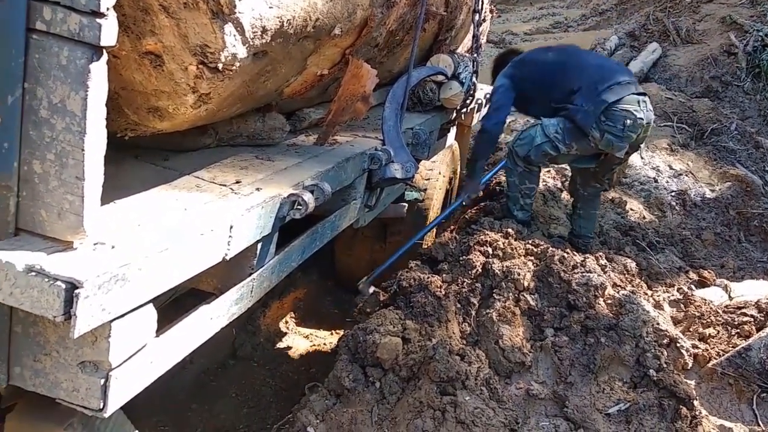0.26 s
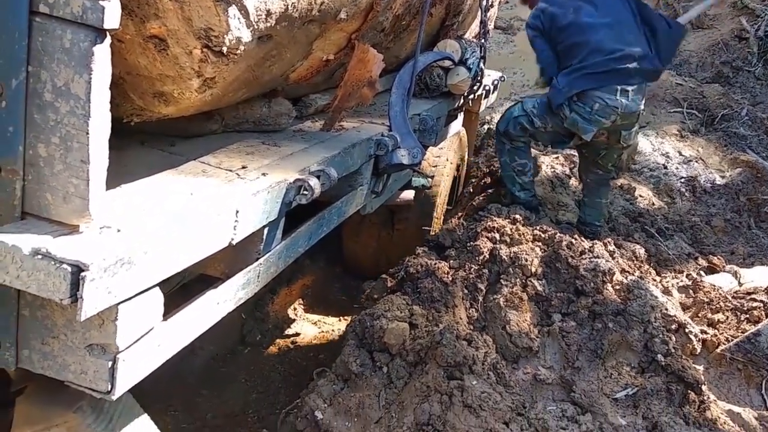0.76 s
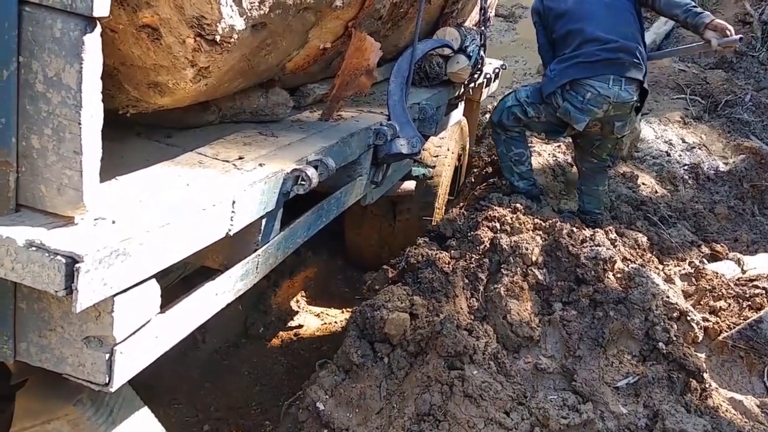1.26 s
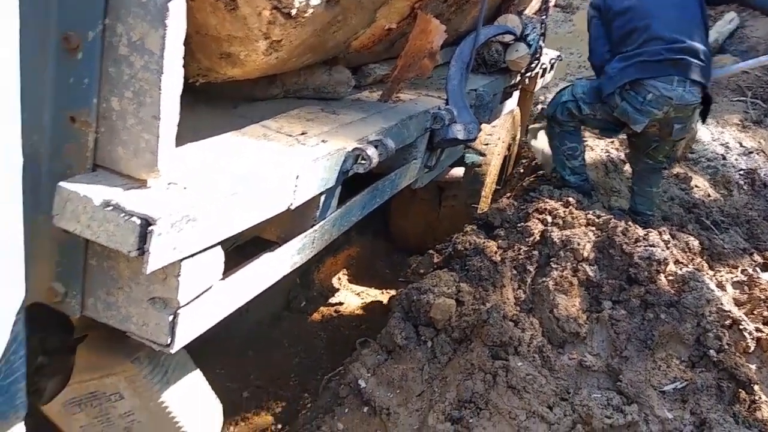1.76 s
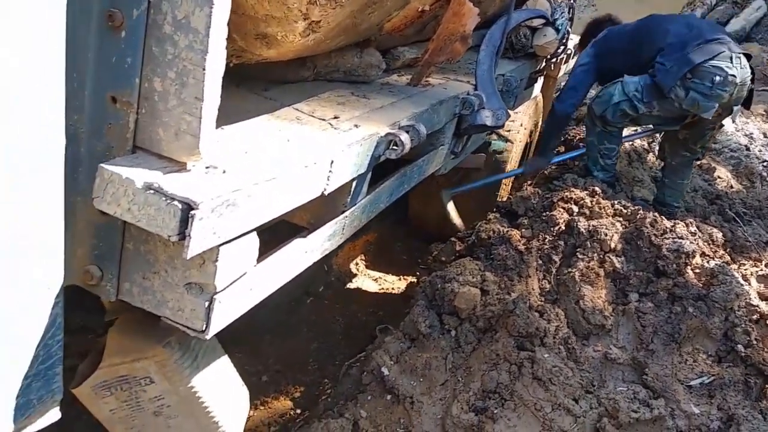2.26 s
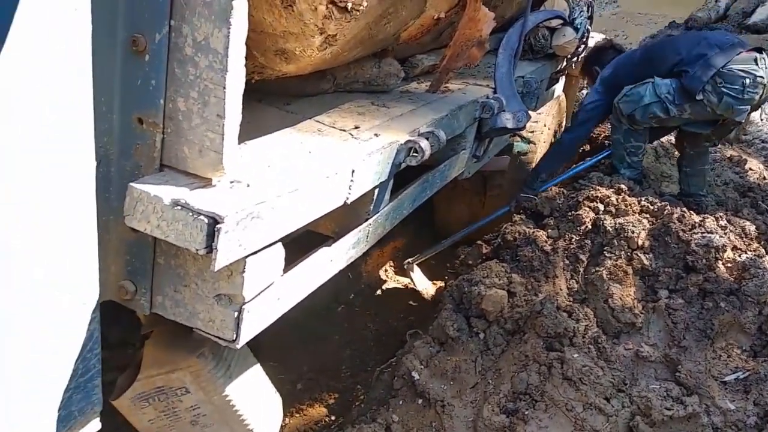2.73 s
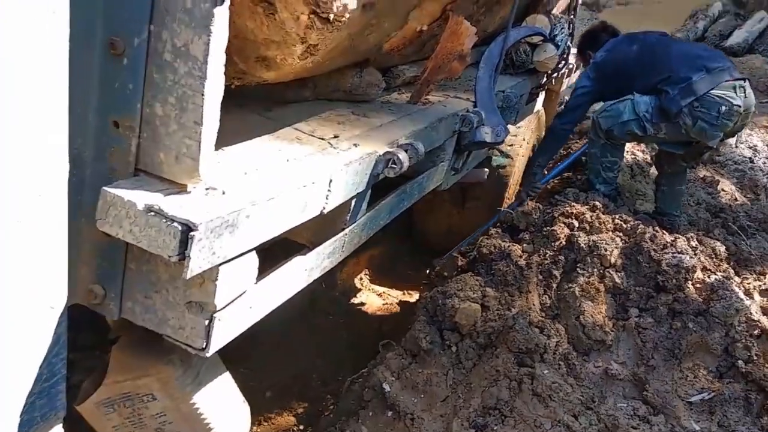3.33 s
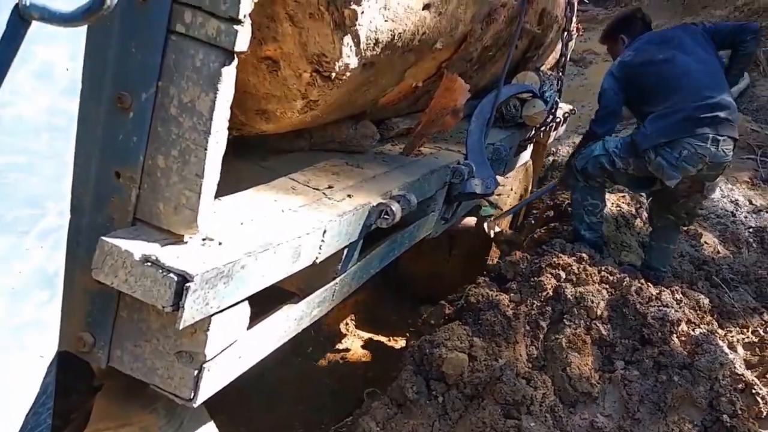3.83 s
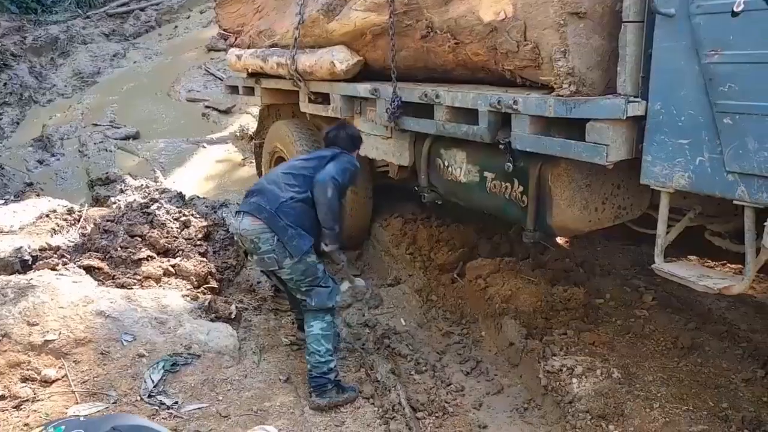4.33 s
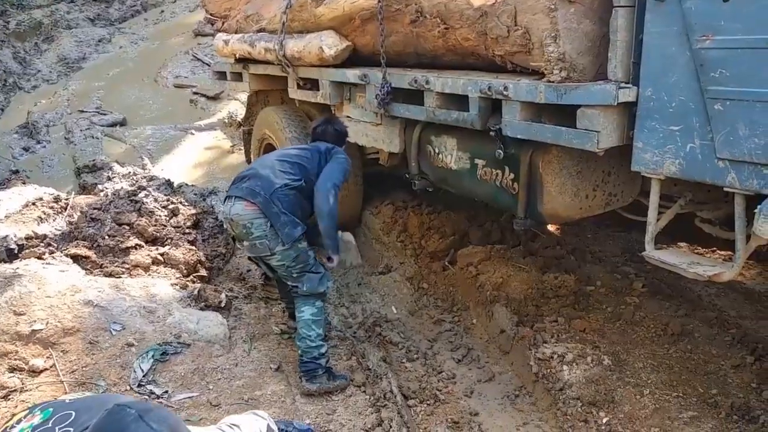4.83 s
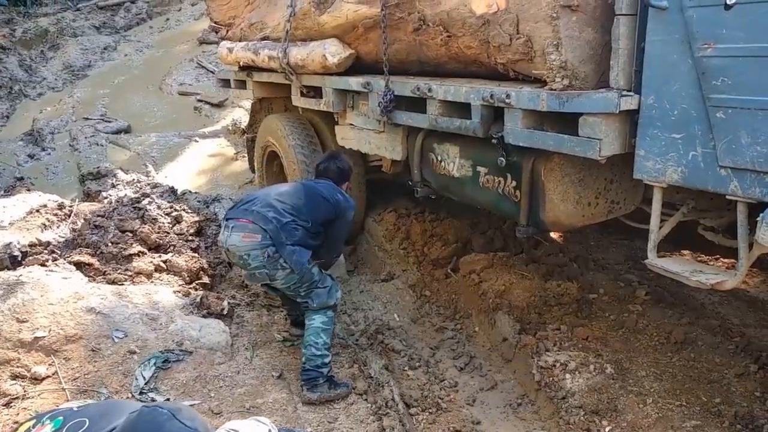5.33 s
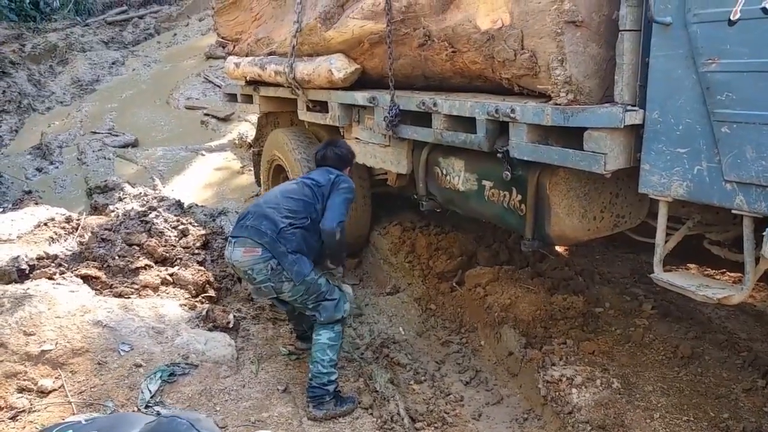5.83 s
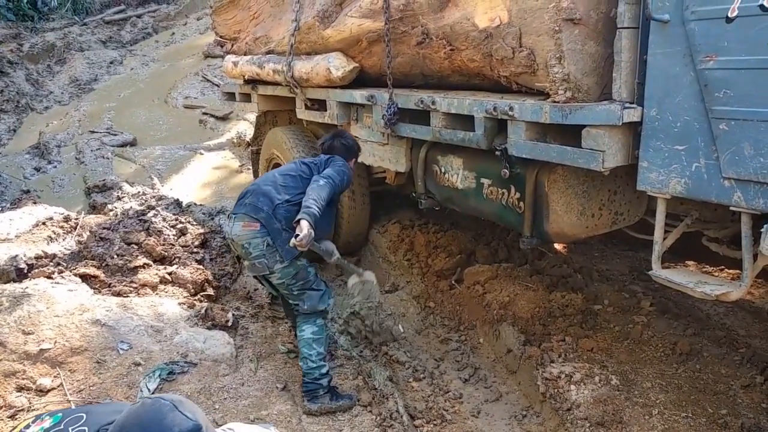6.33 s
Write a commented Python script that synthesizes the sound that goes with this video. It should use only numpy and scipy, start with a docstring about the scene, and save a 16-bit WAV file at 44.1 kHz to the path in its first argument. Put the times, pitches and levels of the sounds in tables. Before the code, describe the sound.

Outdoors, close to a stuck truck, a shovel works wet, gritty soil over a very faint airy hush. At 0.2 s it cuts in with a soft crunch and a dull clod; another cut comes near 0.8 s, and a low bump on the microphone at 0.9 s. It is then nearly quiet, with tiny ticks and thin distant whistles. At 2.18 s a hard thrust cracks and booms in the hollow under the bed, with wet lumps breaking, gulps and bright spray, sinking into a low gurgle by about 3 s. A click and squeak at 3.1 s precede gritty cuts and steel knocks at 3.35-4.0 s, and a bump at 4.1 s. From 4.2 s the digging is darker and muddier: chops, a scrape at 4.9 s, then a dense flurry from 5.3 to 6.2 s with a sharp clank at 5.44 s, heavy wet slaps, squelches and short groans, peaking again at 6.02 s before light sliding.

```python
"""Outdoors at the wheel of a stuck truck, a shovel digs wet soil, heard on a two-port microphone.
Cuts, drags, slaps and clods are bursts of fractures and rubbing noise; stones, knocks and groans ring the blade.
One hard thrust booms in the hollow under the truck bed with breaking lumps, gulps, spray and a gurgle.
Later the digging is busier, and wet mud squelches as popping bubbles. The camera is bumped lightly now and then.
Faint air of drifting filtered noise and a few thin, distant whistles lie behind."""
import sys
import numpy as np
from scipy import signal
from scipy.fft import rfft, irfft, next_fast_len
from scipy.io import wavfile
from scipy.ndimage import uniform_filter1d, map_coordinates

SR = 44100
rng = np.random.default_rng(int(sys.argv[2]) if len(sys.argv) > 2 else 0)


def store_wav(level_fs):
    """Save 16-bit WAV to argv[1]."""
    pcm = np.round(np.clip(np.atleast_2d(level_fs), -1, 1) * 32767)
    wavfile.write(sys.argv[1], SR, pcm.T.astype(np.int16))


N = 290178
T = np.arange(N) / SR
THRUST_S = 2.183  # the hard thrust under the truck bed

# How alike the two microphone ports hear a pitch. Each row: frequency in Hz, left-right correlation (0 to 1).
LIKENESS = [(60, 0.75), (190, 0.94), (320, 0.87), (640, 0.77), (1400, 0.18), (3100, .02), (15000, .018)]
# Balance of a plain cut or slap: relative levels in dB of thud, squelch, crunch and hiss.
CUT_BALANCE = [-2, 1.5, 3.5, -5.5]


def amp(db):
    """Decibels to gain."""
    return 10 ** (np.asarray(db) / 20)


def unit(x):
    """x at rms 1."""
    return x / np.sqrt(np.mean(x ** 2) + 1e-20)


def along(points, hz):
    """Interpolate (Hz, value) points on a log frequency axis."""
    f, v = np.transpose(points)
    return np.interp(np.log(hz + 1), np.log(f + 1), v)


def filtered(x, response):
    """x times a response of frequency, with zeros behind it to take up the tail."""
    n = x.shape[-1]
    m = next_fast_len(n + 2048, real=True)
    return irfft(rfft(x, m) * response(np.fft.rfftfreq(m, 1 / SR)), m)[..., :n]


def add(track, s, sound):
    """Mix a sound into a track at time s."""
    part = track[..., round(s * SR):][..., :sound.shape[-1]]
    part += sound[..., :part.shape[-1]]


def wander(knots, place, **options):
    """A smooth random curve through unit-variance knots, read at the given knot positions."""
    return map_coordinates(rng.standard_normal(knots), [place], **options)


def port_phase(hz):
    """Phase gap in radians between the ports: it widens as a pitch is heard less alike."""
    return np.arccos(np.clip(along(LIKENESS, hz), -1, 1))


def widen(pair):
    """Two unrelated signals to left and right: alike in the bass, unrelated in the treble."""
    mid_side = lambda hz: np.array([np.cos(port_phase(hz) / 2), np.sin(port_phase(hz) / 2)])
    mid, side = filtered(pair, mid_side)
    return np.array([mid + side, mid - side])


def notes(rows, waver, rate):
    """Wavering tones that swell and fade: rows of (s, length, Hz, dB)."""
    out = np.zeros((2, N))
    for s, length, hz, db in rows:
        t = T[:int(length * SR)]
        pitch = hz * (1 + waver * wander(128, t * rate, mode="mirror"))
        apart = port_phase(hz) * np.array([[1], [0]])
        swell = amp(db) * np.sin(np.pi * t / length)
        add(out, s, swell * np.sin(2 * np.pi * np.cumsum(pitch) / SR + apart))
    return out


def air(patchy_db=2):
    """Faint outdoor hush: filtered noise that drifts a little in level and colour."""
    # Colour of the open air. Each row: frequency in Hz, relative level in dB per Hz.
    air_colour = [(15, -56.5), (25, -21.5), (75, -2.5), (233, -8), (582, -6.5), (722, -12), (970, -10.5),
                  (1110, -11.5), (1450, -12), (2300, -7), (2770, -9.5), (4040, -10.5), (5010, -14.5),
                  (12200, -21), (15500, -38)]
    # Each row: time in seconds, level in dB about which the hush drifts.
    air_level = [(0, -66), (1, -64.5), (1.3, -68.5), (1.65, -68), (1.95, -68.5), (2.7, -67), (3.3, -64.5),
                 (3.7, -65.5), (4.18, -66), (4.3, -60.5), (5, -61.5), (5.2, -69), (6.58, -66.5)]
    drift_db = .7 * wander(64, T * 8)
    z = signal.stft(rng.standard_normal((2, N)), nperseg=1024)[2]
    # random gains, smoothed over neighbouring frequencies and then over time
    field = uniform_filter1d(rng.standard_normal(z.shape[1:]), size=4, axis=0)
    field = uniform_filter1d(field, size=9, axis=1)
    patches = signal.istft(z * amp(patchy_db * unit(field)), nperseg=1024)[1][:, :N]
    hush = unit(filtered(widen(patches), lambda hz: amp(along(air_colour, hz))))
    return amp(np.interp(T, *np.transpose(air_level)) + drift_db) * hush


def whistles():
    """Thin, nearly steady notes from far away, perhaps a bird."""
    # Each row: start in seconds, length in seconds, mean pitch in Hz, level in dB.
    whistle_rows = [(0, .07, 2680, -68), (.585, .1, 2670, -66), (1.63, .07, 2720, -71),
                    (1.72, .07, 2720, -69), (1.85, .08, 2720, -72), (4.36, .068, 3080, -60),
                    (4.491, .16, 3030, -62)]
    return notes(whistle_rows, waver=.005, rate=60)


def scatter(x, t60):
    """Two different bursts of reflections off the truck and the ground."""
    t = T[:SR // 8]
    paths = rng.standard_normal((2, len(t))) * amp(-60 * t / t60)
    paths /= np.linalg.norm(paths, axis=1, keepdims=True)
    return signal.fftconvolve(x[None], paths, axes=1)[:, :len(x)]


def crumbs(n, rate, spread_db, smooth, scatter_t60=0.021, clump_db=1.0, clump_rate=90):
    """Soil breaking: rate fractures a second, many small and few large, over a power share of smooth rubbing."""
    size, chance, sign = rng.random((3, n))
    sizes = amp(spread_db * np.minimum(-np.log(1 - size), 4))
    grains = sizes * (chance < rate / SR) * np.sign(sign - .5)
    # the blade sticks and slips, so the breaking comes in clumps
    clumps = amp(clump_db * wander(400, T[:n] * clump_rate, order=1))
    rubbing = rng.standard_normal((2, n))
    return clumps * (np.sqrt(1 - smooth) * unit(scatter(grains, scatter_t60)) + np.sqrt(smooth) * rubbing)


def ripple(hz, density):
    """A smooth random curve over frequency; its knots are evenly spread in the bass and treble, log between."""
    return wander(400, (np.log2(1 + hz / 300) + hz / 2500) * density, order=2)


def soil_colour(s):
    """Frequency response of the soil, the blade and the place that is being dug at time s."""
    # Three digging places. Each row: frequency in Hz, relative level in dB per Hz.
    mound = [(35, -45.5), (60, -11.5), (339, -6.5), (448, -14.5), (938, -6), (1670, -3), (1960, 0.5),
             (2590, -1.5), (4950, -9), (15000, -24)]
    below_bed = [(30, -51.5), (52, -21), (74, -7.5), (107, -25.5), (140, -16.5), (195, -7), (280, -16),
                 (500, -15), (760, -24), (880, -16.5), (1450, -26), (1750, -22), (4400, -29), (6100, -29),
                 (8500, -26), (10300, -38), (15000, -35.5)]
    by_wheel = [(35, -48), (60, -36), (130, -10), (225, -5.5), (285, -8.5), (400, -6.5), (580, -12),
                (760, -7), (1200, -15), (1550, -12.5), (2000, -18), (2700, -17), (6500, -30.5),
                (13000, -42.5), (15000, -40.5)]
    # The truck shades the sound under its bed. Each row: frequency in Hz, left minus right in dB.
    bed_lean = [(300, -1.5), (1200, 1), (4400, 1), (8100, -3.5), (15000, 0.5)]
    # Resonances of the loaded shovel. Each row: frequency in Hz, width in Hz, lift in dB.
    blade_modes = [(201, 47, 6.5), (360.3, 32, 6.5), (435, 32, 5.5), (707, 54, 3), (880, 130, 1),
                   (1870, 110, -3), (2190, 85, 1.5)]
    second_spot_s = 4.22  # from here the digging is beside the wheel
    pocket_db, pocket_top_hz, pocket_density = 3, 6000, 12
    under_bed = -.03 < s - THRUST_S < .45
    place = below_bed if under_bed else by_wheel if s > second_spot_s else mound

    def response(hz):
        shade = under_bed * along(bed_lean, hz) * np.array([[.5], [-.5]])
        shovel = sum(db / (1 + (2 * (hz - f) / width) ** 2) for f, width, db in blade_modes)
        # air pockets and the load on the blade give each stroke resonances of its own
        pockets = pocket_db * ripple(hz, pocket_density) / (1 + (hz / pocket_top_hz) ** 4)
        return amp(along(place, hz) + shade + shovel + pockets)
    return response


def stroke(s, rise, t60, levels, grains):
    """Breaking soil builds as the blade bites and dies away; returns its start time and its sound."""
    # Thud, squelch, crunch and hiss. Each row: low edge in Hz, high edge in Hz, trim in dB.
    soil_bands = [(45.3, 448, -1.5), (467, 1370, -4), (1617, 4730, -2.5), (5670, 11600, 1)]
    start = max(s - rise, 0)
    t = start + T[:grains.shape[1]] - s
    envelope = np.clip(1 + t / rise, 0, 1) ** 2 * amp(-60 * np.maximum(t, 0) / t60)
    soil = filtered(widen(grains), soil_colour(s))
    out = 0
    for (lo, hi, trim_db), db in zip(soil_bands, levels):
        band = lambda hz: 1 / np.sqrt((1 + (lo / (hz + 1)) ** 10) * (1 + (hz / hi) ** 10))
        part = envelope * filtered(soil, band)
        out = out + amp(db + trim_db) * unit(part) * np.sqrt(np.mean(envelope ** 2))
    return start, out


def digging(strokes, rate, spread_db, smooth):
    """Play strokes (s of the peak, rise, t60, four levels), each on fresh soil."""
    out = np.zeros((2, N))
    for s, rise, t60, levels in strokes:
        n = min(int((rise + .8 * t60) * SR), SR)
        add(out, *stroke(s, rise, t60, levels, crumbs(n, rate, spread_db, smooth)))
    return out


def soil_levels(balance_db, db, grit_db=0):
    """Levels of thud, squelch, crunch and hiss: force lifts them all, grit tips them towards the treble."""
    # dB that thud, squelch, crunch and hiss each gain per dB of grit
    grit_tilt = [-1.86, -0.26, 0.88, 1]
    return np.array(balance_db) + db + grit_db * np.array(grit_tilt)


def slides():
    """The blade drags and loose soil slides: drags swell slowly and crumbs tick through the rubbing."""
    # Each row: peak in seconds, rise in seconds, t60 in seconds, force in dB, grit in dB (above 0 drier).
    slide_rows = [(.421, 0.3, 0.27, -66.5, -0.5), (.639, 0.14, 1.4, -86, 17.5), (2.57, 0.15, 0.41, -65, 5),
                  (2.916, 0.19, 1.6, -60.5, 1), (3.122, .04, 0.2393, -57.5, -0.5),
                  (3.601, 0.18, 1.6, -72, 2.5), (3.8, 0.045, 0.52, -56.5, -0.5),
                  (4.44, 0.12, 0.63, -63.5, -3.5), (4.589, 0.16, 0.21, -70, 0),
                  (4.631, 0.062, 0.26, -63.5, 14), (4.88, 0.35, 1.9, -66, -2),
                  (4.924, .035, 0.15, -51.5, 0.5), (5.36, .2, .3, -56, 2), (5.429, 0.053, 1.05, -56, 11),
                  (5.549, 0.038, 0.92, -50, 1.5), (5.97, .03, 1.4, -58, -3.5),
                  (6.024, 0.027, 0.37, -42.5, -0.5), (6.182, 0.053, 0.23, -57.5, 3.5),
                  (6.249, 0.083, 1.6, -63.5, 1.5), (6.579, 0.19, .2, -66, 4.5)]
    # Balance of a plain drag: relative levels in dB of thud, squelch, crunch and hiss.
    slide_balance = [-3.5, -0.5, 0, -3]
    strokes = [(s, rise, t60, soil_levels(slide_balance, db, grit_db))
               for s, rise, t60, db, grit_db in slide_rows]
    return digging(strokes, rate=480, spread_db=3.5, smooth=0.32)


def chops(rise=.0115):
    """The blade cuts in: every cut bites equally fast; its force and the soil that it meets differ."""
    # Each row: peak in seconds, t60 in seconds, force in dB,
    # grit in dB (above 0 dry and sandy, below 0 wet and heavy).
    chop_rows = [(.192, 0.46, -54, 4.5), (.259, 0.15, -45, -0.5), (0.463, 0.28, -86, 28),
                 (.745, 0.43, -59.5, 0), (.794, 0.24, -53.5, 2), (1.425, 0.37, -75.5, 15),
                 (2.026, 0.74, -67.5, 0), (2.808, 0.21, -56, 0.5), (2.986, 0.022, -57.5, 2),
                 (3.35, 0.18, -45.5, 1), (3.365, 0.068, -47.5, 4), (3.485, 0.18, -56.5, 3),
                 (3.923, 0.19, -56, -0.5), (4.036, 0.15, -59.5, 3), (4.248, 0.31, -53.5, -1),
                 (4.309, 0.19, -53, -1), (4.573, 0.16, -56, 7), (4.919, 0.15, -48.5, -.5),
                 (5.44, 0.17, -40.5, 5.5), (5.475, 0.099, -48.5, -1), (5.549, 0.17, -44, 1.5),
                 (5.58, 0.12, -41.5, -3.5), (5.602, 0.034, -39.5, -4.5), (5.688, 0.1, -48.5, -4),
                 (5.759, 0.13, -53.5, -1.5), (5.843, 0.087, -61.5, -2), (6.124, 0.14, -44, -2.5)]
    strokes = [(s, rise, t60, soil_levels(CUT_BALANCE, db, grit_db)) for s, t60, db, grit_db in chop_rows]
    return digging(strokes, rate=700, spread_db=1.0, smooth=0.13)


def thumps(rows, rise=0.00712, waver=0.47, lowest_hz=85):
    """Landing mud gives a few uneven low cycles: rows of (s of the peak, t60, dB, Hz)."""
    out, t = np.zeros(N), T[:SR // 4]
    for s, t60, db, hz in rows:
        phase = 2 * np.pi * (hz * t + rng.random()) + waver * wander(64, t * 120)
        envelope = np.minimum(t / rise, 1) ** 2 * amp(db - 60 * np.maximum(t - rise, 0) / t60)
        add(out, s - rise, envelope * np.sin(phase))
    return filtered(out, lambda f: 1 / np.sqrt(1 + (lowest_hz / (f + 1)) ** 8))


def clods(rise=.012, thump_db=0.5):
    """Wet clods land with a dull slap of soil and a low thump, each at its own pitch."""
    # Each row: peak in seconds, t60 in seconds, force in dB, pitch of the thump in Hz.
    clod_rows = [(0.211, 0.14, -44, 347), (1.429, 0.16, -63.5, 189), (1.728, 0.17, -59.5, 192),
                 (2.813, 0.096, -44.5, 383), (2.844, 0.06, -51.5, 214), (3.8, 0.1, -53.5, 200.4),
                 (4.247, 0.076, -42.5, 297), (4.278, 0.14, -49, 268), (4.308, 0.069, -50, 400),
                 (4.349, 0.13, -48.5, 324), (4.48, 0.16, -50.5, 254), (5.015, 0.072, -46.5, 169),
                 (5.306, 0.081, -40, 211.4), (5.442, 0.048, -39.5, 145), (5.473, 0.1, -33, 227),
                 (5.54, 0.067, -34, 181), (5.579, .07, -39, 211), (5.601, 0.19, -39, 202),
                 (5.634, 0.2, -45.5, 245), (5.666, 0.14, -44, 204), (5.692, 0.2, -40.5, 233.2),
                 (5.722, 0.072, -45.5, 216), (5.757, 0.18, -46, 242), (5.8, 0.16, -42, 225),
                 (5.839, 0.25, -40, 227.5), (5.921, 0.1, -46, 243), (6.018, 0.044, -30.5, 196),
                 (6.022, 0.11, -32, 443), (6.052, 0.098, -32.5, 244), (6.072, 0.14, -36.5, 236),
                 (6.119, 0.088, -44, 257)]
    # Balance of the slap: relative levels in dB of thud, squelch, crunch and hiss.
    clod_balance = [-4, -11.5, -16.5, -35]
    strokes = [(s, rise, t60, soil_levels(clod_balance, db)) for s, t60, db, hz in clod_rows]
    return digging(strokes, rate=1000, spread_db=0.0, smooth=0.25) + amp(thump_db) * thumps(clod_rows)


def knocks(attack=0.0011, vary_db=2.0, blur=0.39):
    """The nearly bare blade knocks on hard ground: the same steel rings, as shifting mud detunes and damps it."""
    # Each row: start in seconds, level in dB, ring time as a ratio to that of the free blade.
    knock_rows = [(.256, -49.5, 0.84), (0.792, -53, 0.49), (1.152, -58, 0.68), (3.346, -50, 0.88),
                  (3.365, -49.5, 0.8), (3.485, -47.5, 0.67), (3.584, -59, 0.88), (3.797, -63, 0.63),
                  (3.919, -49, 0.67), (3.95, -58, 0.76), (4.035, -56.5, 0.55), (4.914, -49, 0.6),
                  (5.441, -33, 0.43)]
    # Modes of the free steel blade. Each row: mean pitch in Hz, relative level in dB, t60 in seconds.
    steel_modes = [(250.7, -5, 0.15), (950.4, 0, 0.2), (1120, -9.5, 0.19), (1493, -7.5, 0.25),
                   (1995, -1.5, .14), (2450, -4, 0.15), (2810, -11, 0.22), (4050, -13, 0.1)]
    out, t = np.zeros((2, N)), T[:SR // 3]
    for s, db, life in knock_rows:
        for hz, mode_db, t60 in steel_modes:
            strength, detune = rng.standard_normal(2)
            chatter = wander(64, t * 110)
            apart = port_phase(hz) * np.array([[-.5], [.5]]) * rng.choice([-1, 1])
            ring = np.sin(2 * np.pi * hz * (1 + .015 * detune) * t + blur * chatter + apart)
            decay = amp(db + mode_db + vary_db * strength - 60 * t / (life * t60))
            add(out, s, decay * (1 - np.exp(-t / attack)) * ring)
    return out


def stones(ring_db=6, blunt_db=12, attack=0.0012, t60_at_1khz=0.074, damping=0.35):
    """Mud damps the blade, so a stone gives a crack and a short rough clank; broader cracks ring less."""
    # Each row: start in seconds, level in dB, pitch in Hz, width of the crack in octaves.
    stone_rows = [(.743, -42, 3130, 0.89), (1.152, -46.5, 1256, 0.97), (1.417, -51.5, 3680, 0.65),
                  (1.448, -51.5, 3840, 0.79), (2.18, -20.5, 4170, 0.61), (2.806, -50, 622, 0.6),
                  (3.139, -39, 4950, 0.36), (3.181, -44, 8500, 0.54), (3.346, -42.5, 1935, 0.22),
                  (3.486, -50.5, 1480, 0.25), (3.708, -55, 2920, 0.34), (3.876, -52, 2400, 0.19),
                  (3.917, -49.5, 1033, 0.48), (4.231, -41.5, 8000, 0.56), (4.232, -48.5, 570, 0.43),
                  (4.308, -46.5, 610, 0.42), (4.309, -50.5, 2480, 0.52), (4.513, -57, 1560, 0.2),
                  (4.571, -48.5, 880, 0.74), (5.269, -46, 1060, 0.66), (5.3, -37, 836, 0.31),
                  (5.438, -33.5, 745, 0.14), (5.44, -37, 1400, .5), (5.576, -36, 753, 0.28),
                  (5.599, -42, 847, 0.41), (5.626, -40.5, 720, 0.61), (5.715, -48.5, 856, 0.28),
                  (5.962, -42.5, 700, 0.39), (6.02, -42, 780, 0.28), (6.184, -41, 1554, .2),
                  (6.185, -45, 2570, 0.78), (6.3, -53.5, 2180, 0.37)]
    out, t = np.zeros((2, N)), T[:SR // 6]
    for s, db, hz, octaves in stone_rows:
        t60 = t60_at_1khz * (hz / 1000) ** -damping
        # the stone chatters along the steel and blurs the pitch
        chatter = np.array([wander(400, t * min(hz / 5, 900)) for side in range(2)])
        apart = port_phase(hz) * np.array([[1], [0]])
        ring = amp(ring_db - blunt_db * octaves) * np.sin(2 * np.pi * hz * t + apart + .6 * chatter)
        around = lambda f: 1 / (1 + (np.log2((f + 1) / hz) / octaves) ** 2) ** 2
        crack = unit(filtered(widen(rng.standard_normal((2, len(t)))), around))
        add(out, s, amp(db - 60 * t / t60) * (1 - np.exp(-t / attack)) * (ring + crack))
    return out


def bumps(attack=0.0054, click_s=0.00018):
    """Bumps on the camera: a soft click and a few low cycles of its body."""
    # Each row: start in seconds, thump level in dB, pitch in Hz, t60 in seconds, click level in dB.
    bump_rows = [(0.908, -26, 125.6, 0.028, -67), (1.403, -55, 103, 0.15, -90),
                 (1.679, -53, 106, 0.12, -96), (2.021, -53, 100, 0.099, -90), (2.098, -50, 109, 0.11, -90),
                 (3.1189, -50, 189, 0.036, -31.5), (4.101, -30.5, 105, 0.045, -35)]
    out, t = np.zeros(N), T[:SR // 8]
    u = t / click_s
    click = 2 * u * (2 - u) * np.exp(-u)
    for s, db, hz, t60, click_db in bump_rows:
        thump = amp(db - 60 * t / t60) * (1 - np.exp(-t / attack)) * np.sin(2 * np.pi * hz * t)
        add(out, s, thump + amp(click_db) * click)
    return out


def slaps(rise=0.001064):
    """The flat of the blade slaps packed mud: it lands all at once, without the bite of a cut."""
    # Each row: peak in seconds, t60 in seconds, force in dB, grit in dB (above 0 drier).
    slap_rows = [(1.152, .15, -74.5, -6.5), (2.101, 0.21, -52, -5), (4.2319, 0.087, -44, -2),
                 (5.269, 0.056, -55.5, 4), (5.2997, 0.068, -45.5, -3)]
    strokes = [(s, rise, t60, soil_levels(CUT_BALANCE, db, grit_db)) for s, t60, db, grit_db in slap_rows]
    return digging(strokes, rate=1500, spread_db=2.5, smooth=0.58)


def thrust(rise=.03, t60=0.28, lump_rise=.01, settle_delay_s=0.21, settle_rise=0.1, settle_t60=0.87):
    """The hard thrust bites, its load breaks off in wet lumps and then settles with a low rumble."""
    # Lumps break off. Each row: peak in seconds, t60 in seconds, force in dB, grit in dB (above 0 drier).
    lump_rows = [(2.192, .12, -29.5, 9), (2.209, .13, -30.5, 0), (2.228, 0.11, -27.5, 5),
                 (2.244, 0.19, -27.5, 0), (2.262, 0.24, -26.5, -3), (2.286, .19, -31, 1),
                 (2.305, 0.18, -36, 3.5), (2.33, 0.14, -40.5, -4), (2.36, 0.28, -45.5, -5),
                 (2.411, 0.21, -49.5, -5), (2.5, 0.25, -56, -5), (2.55, 0.19, -54.5, -6)]
    # Levels in dB of thud, squelch, crunch and hiss, ahead of the band trims: bite, lump (relative), rumble.
    bite_levels = [-29, -27.5, -21, -32]
    lump_balance = [-11, -1.5, -2.5, -27]
    rumble_levels = [-47, -55, -61, -83]
    bite = (THRUST_S, rise, t60, bite_levels)
    lumps = [(s, lump_rise, life, soil_levels(lump_balance, db, grit_db)) for s, life, db, grit_db in lump_rows]
    settle = (THRUST_S + settle_delay_s, settle_rise, settle_t60, rumble_levels)
    return digging([bite, *lumps, settle], rate=450, spread_db=2.5, smooth=0.15)


def gulps():
    """Big air cavities gulp as the thrust goes under: a few low cycles that glide as the size changes."""
    # Each row: start in seconds, length in seconds, first pitch in Hz, last pitch in Hz, level in dB.
    gulp_rows = [(2.174, 0.042, 183, 225, -26), (2.222, 0.026, 170, 150, -27),
                 (2.266, 0.051, 202, 179, -30.5), (2.312, 0.052, 214.5, 200, -37.5),
                 (2.355, 0.067, 169, 143, -40)]
    out = np.zeros(N)
    for s, length, first_hz, last_hz, db in gulp_rows:
        t = T[:int(length * SR)]
        pitch = first_hz + (last_hz - first_hz) * t / length
        add(out, s, amp(db) * np.sin(np.pi * t / length) * np.sin(2 * np.pi * np.cumsum(pitch) / SR))
    return out


def boom(level_db=-28, attack=0.032, waver_db=6.5):
    """The hard thrust rings the hollow and the steel under the truck bed as wavering, decaying modes."""
    # Each row: pitch in Hz, relative level in dB, t60 in seconds.
    hollow_modes = [(113, -21.5, 1.7), (151, -13, 1.21), (195.2, -6, 0.76), (218, -15, 0.55),
                    (243.4, -5, 0.57), (354, -13.5, 0.8), (523, -9, 0.39), (854, -1, 0.32),
                    (1120, -15.5, 0.7), (1700, -6.5, 0.23), (1920, -2.5, 0.17), (2197, -2, 0.27),
                    (2600, 1, .28), (2870, -1, 0.28)]
    out, t = np.zeros((2, N)), T[:3 * SR // 2]
    for hz, db, t60 in hollow_modes:
        waver = wander(64, t * 25)
        # the higher a mode, the more its phase differs between the two ports
        apart = port_phase(hz) * np.array([[-.5], [.5]]) * rng.choice([-1, 1])
        ring = np.sin(2 * np.pi * (hz * t + rng.random()) + apart + .4 * waver)
        decay = amp(level_db + db + waver_db * waver - 60 * t / t60)
        add(out, THRUST_S, decay * (1 - np.exp(-t / attack)) * ring)
    return out


def bubbles(s, length, t60, lo_hz, hi_hz, cycles, glide, spread_db, count):
    """Air pockets pop in wet mud at uneven moments, each rising in pitch, the later ones weaker."""
    out, t = np.zeros((2, N)), T[:SR // 8]
    for k, (when, pitch, size, side) in enumerate(rng.random((count, 4))):
        delay = length * (k + when) / count
        hz = lo_hz * (hi_hz / lo_hz) ** pitch
        age = t * hz / cycles  # a pop fades by 60 dB in this many cycles
        apart = port_phase(hz) * (2 * side - 1) * np.array([[1], [-1]])
        tone = np.sin(2 * np.pi * hz * t * (1 + glide * np.minimum(age, 1)) + apart)
        decay = amp(-spread_db * size - 60 * delay / t60 - 60 * np.minimum(age, 3))
        add(out, s + delay, decay * tone * (1 - np.exp(-t * hz)))
    return out


def splatter(level_db=-22):
    """Wet spray from the hard thrust: many small bright pops."""
    return amp(level_db) * bubbles(THRUST_S, length=.16, t60=0.66, lo_hz=820, hi_hz=4530,
                                   cycles=31, glide=.06, spread_db=17, count=90)


def gurgle(level_db=-47):
    """Mud closes over the hole that the thrust leaves: many low, overlapping bubbles."""
    return amp(level_db) * bubbles(THRUST_S + 0.25, length=0.62, t60=1.4, lo_hz=139, hi_hz=565,
                                   cycles=13, glide=.08, spread_db=3, count=64)


def groans():
    """The dragged blade chatters on one resonance, as a low groan or a brief squeak."""
    # Each row: start in seconds, length in seconds, mean pitch in Hz, level in dB.
    groan_rows = [(3.131, 0.023, 5000, -44), (3.155, 0.021, 3440, -55), (4.42, 0.064, 464, -58),
                  (5.74, 0.029, 504, -44), (5.825, 0.032, 461.3, -53), (5.955, 0.058, 470, -49.5),
                  (6.155, 0.05, 423, -48.5), (6.26, 0.036, 414, -56), (6.29, 0.025, 411, -46)]
    return notes(groan_rows, waver=0.096, rate=436)


def squelches():
    """Small air pockets burst one after another as the blade presses the wet mud."""
    # Each row: start in seconds, length in seconds, level in dB.
    squelch_rows = [(4.235, .12, -47), (5.543, 0.14, -35), (5.668, .2, -41), (6.015, 0.12, -33)]
    return sum(amp(db) * bubbles(s, length, t60=.8, lo_hz=510, hi_hz=1160,
                                 cycles=13, glide=0.073, spread_db=15, count=11)
               for s, length, db in squelch_rows)


def scene(echo_db=-20, echo_t60=0.12):
    """The work, its short echo off the truck and the ground, the camera bumps and the open air."""
    work = slides() + chops() + clods() + knocks() + stones() + slaps() + groans() + squelches()
    work = work + thrust() + gulps() + boom() + splatter() + gurgle()
    echo = widen(scatter(work.mean(axis=0), echo_t60))
    return work + amp(echo_db) * echo + bumps() + whistles() + air()


def record(dry, left_lag_s=.00011, top_hz=15600):
    """The two microphone ports differ in colour and the left hears slightly later; a band limit cuts the top."""
    # Colour of the ports. Each row: frequency in Hz, left minus right in dB.
    port_lean = [(60, 5.5), (180, -0.5), (550, 0.5), (1650, 2), (4970, 0.5), (15000, -2.5)]
    half = np.array([[.5], [-.5]])
    # the work is a little to the right, so the left port lags
    lag = lambda hz: np.exp(-2j * np.pi * hz * left_lag_s * half)
    return filtered(dry, lambda hz: amp(along(port_lean, hz) * half) * lag(hz) * (hz < top_hz))


dry = scene()
out = record(dry)
store_wav(out)
```